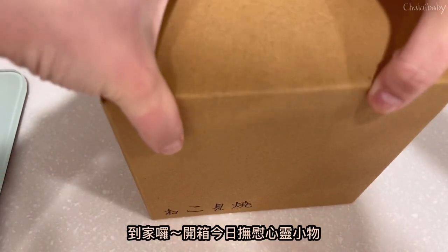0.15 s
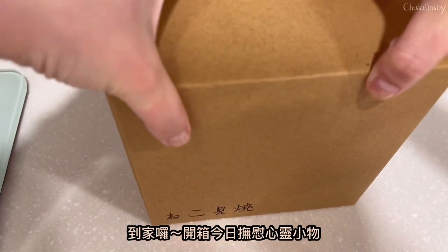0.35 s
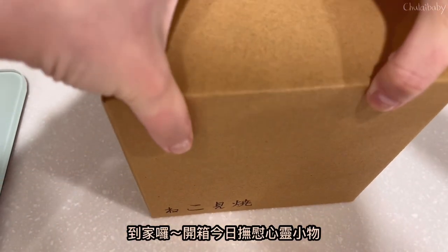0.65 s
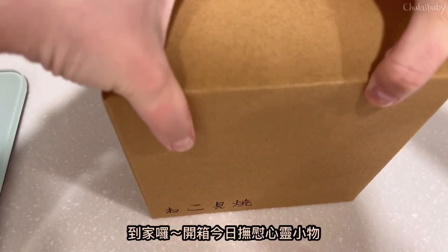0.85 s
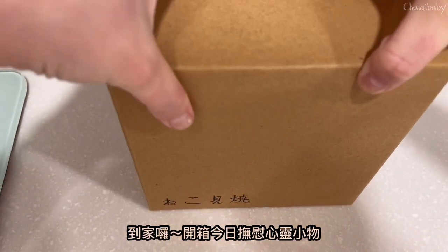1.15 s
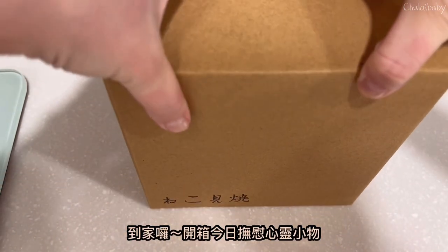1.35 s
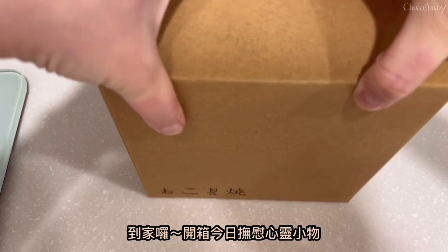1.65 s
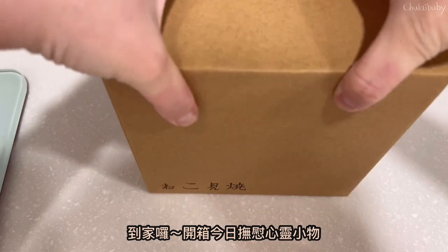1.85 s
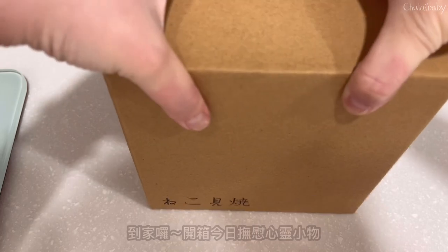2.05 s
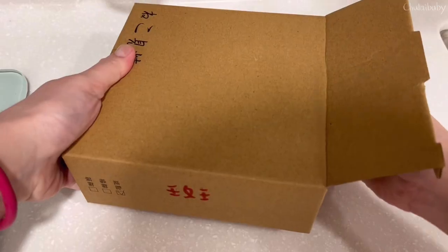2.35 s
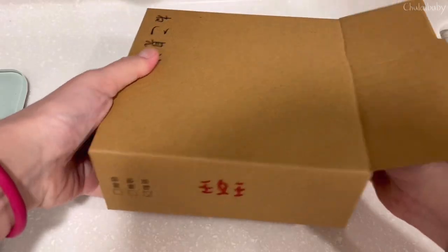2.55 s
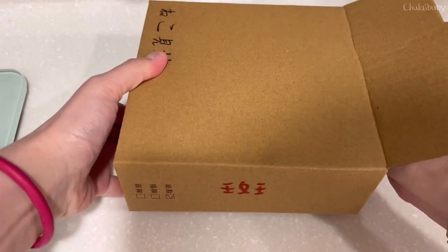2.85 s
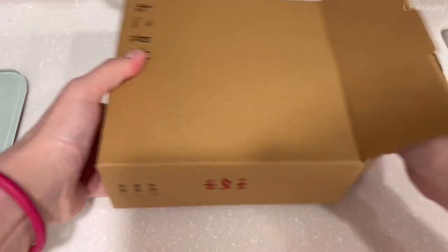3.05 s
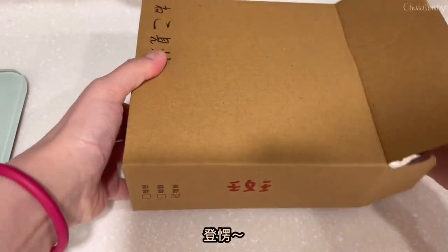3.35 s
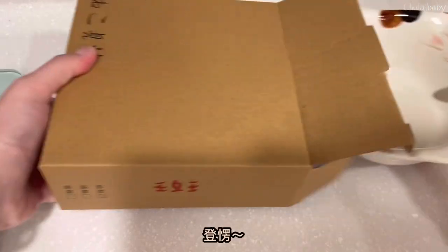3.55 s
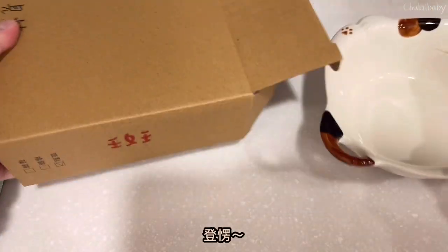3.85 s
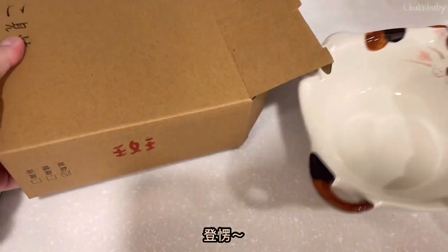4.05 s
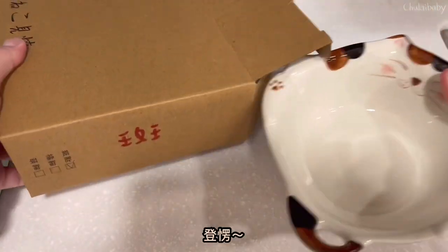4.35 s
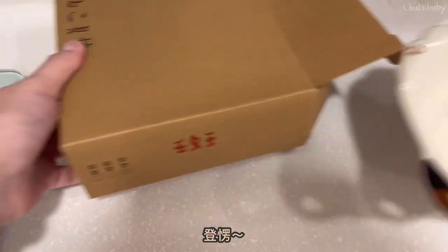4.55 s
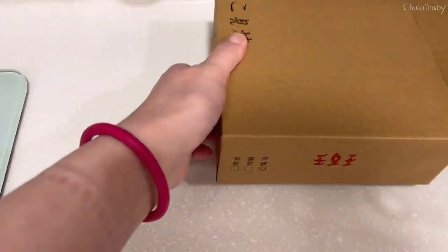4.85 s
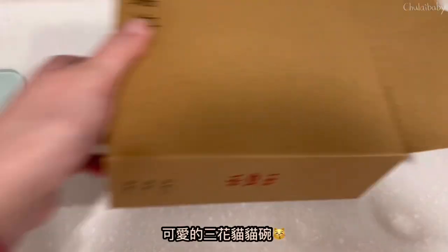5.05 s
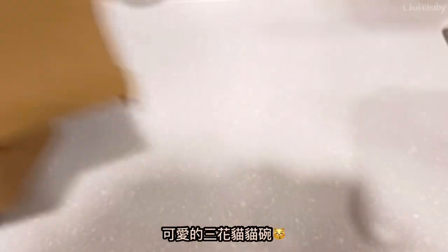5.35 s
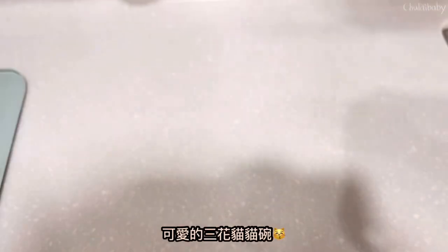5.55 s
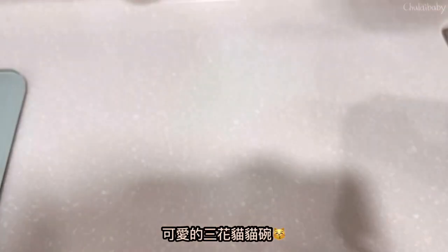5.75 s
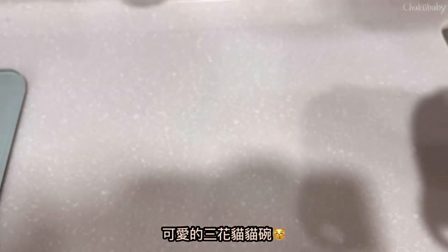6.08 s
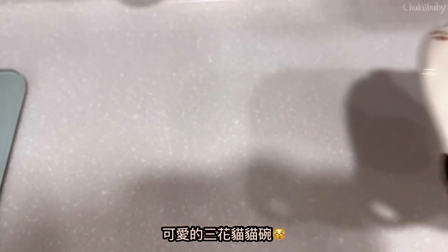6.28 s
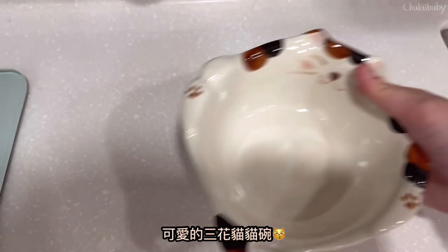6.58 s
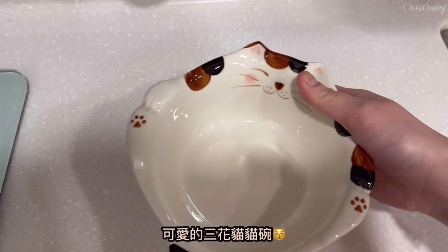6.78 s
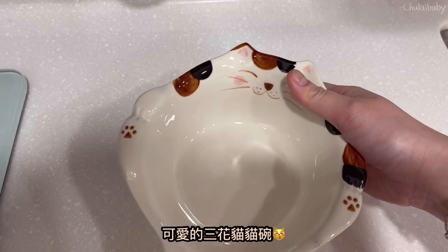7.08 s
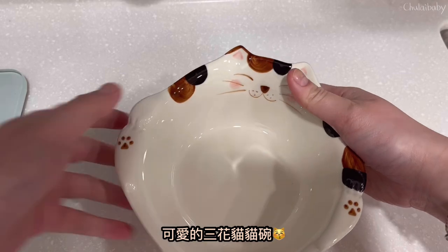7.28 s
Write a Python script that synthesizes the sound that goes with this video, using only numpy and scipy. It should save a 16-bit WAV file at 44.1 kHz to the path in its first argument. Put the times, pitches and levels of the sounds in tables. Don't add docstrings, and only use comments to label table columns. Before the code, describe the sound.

Close cardboard creaks, dull flap knocks and dry cracks, followed by a scraping bowl, a bright ceramic clink and soft handling bumps.

```python
import sys
import numpy as np
from scipy import signal
from scipy.fft import rfft, irfft, next_fast_len
from scipy.io import wavfile

SR = 44100
rng = np.random.default_rng(int(sys.argv[2]) if len(sys.argv) > 2 else 0)


def volts(x):
    e = np.asarray(x, float) / 20
    return 10 ** e


def store_pcm(level_fs):
    pcm = np.round(np.clip(level_fs, -1, 1) * 32767).astype(np.int16)
    wavfile.write(sys.argv[1], SR, np.atleast_2d(pcm).T)


N = 327222

# mode_hz, width_hz, level_db
BOX_MODES = [(447, 60, -5), (582, 50, -11.5), (780, 140, -9.5), (1006, 75, -16), (1315, 120, -17.5),
             (1416, 27, -10), (2430, 170, -14), (3230, 53, -10.5), (3680, 11, -29), (4770, 83, -15.5),
             (5418, 69, -10.5), (6750, 42, -16)]


def rms_one(x):
    return x / np.sqrt(np.mean(x ** 2) + 1e-20)


def peak_one(x):
    return x / abs(x).max(axis=1, keepdims=True)


def band(x, low_hz, high_hz, order=2):
    return signal.sosfilt(signal.butter(order, [low_hz, high_hz], "band", fs=SR, output="sos"), x)


def tinted(x, points):
    hz, db = np.transpose(points)
    size = next_fast_len(N)
    bins = np.maximum(np.fft.rfftfreq(size, 1 / SR), 1)
    gain = volts(np.interp(np.log(bins), np.log(hz), db))
    return irfft(rfft(x, size) * gain, size)[..., :N]


def drift(rate_hz):
    r = np.exp(-2 * np.pi * rate_hz / SR)
    noise = rng.standard_normal(N + SR)
    return rms_one(signal.lfilter([1], [1, -2 * r, r * r], noise)[SR:])


def ring(push, hz, t60):
    r, w = volts(-60 / (t60 * SR)), 2 * np.pi * hz / SR
    return signal.lfilter([0, np.sin(w)], [1, -2 * r * np.cos(w), r * r], push + 1e-18)


def body(push, modes, widen, patchy_db):
    out = 0
    for k, (hz, width_hz, db) in enumerate(modes):
        r = np.exp(-np.pi * width_hz * widen / SR)
        w = 2 * np.pi * hz / SR
        grip = volts(db + patchy_db * drift(8.0))
        unit_gain = [(1 - r * r) / 2, 0, (r * r - 1) / 2]
        mode = signal.lfilter(unit_gain, [1, -2 * r * np.cos(w), r * r], push)
        out = out + (-1) ** k * grip * mode
    return out


def room_tone():
    # band_hz, density_db
    spectrum = [(18, -36), (30, -2), (64, 5.5), (143, 1), (222, -22), (448, -22.5), (716, -26),
                (6040, -47.5), (10200, -55.5), (12500, -42.5), (15000, -65)]
    return volts(-68) * rms_one(tinted(rng.standard_normal((2, N)), spectrum))


def echo(x, t60, gap_s, channels):
    shift_s = 0.3
    t, hop = np.arange(SR // 3) / SR, round(shift_s * SR)
    out = np.zeros((channels, N + 2 * SR))
    fade = np.sin(np.pi * np.arange(2 * hop) / (2 * hop))
    x = np.pad(x, (hop, 2 * hop))
    for i in range(0, N + hop, hop):
        tail = rng.standard_normal((channels, len(t))) * volts(-60 * t / t60) * (t > gap_s)
        tail = unit_energy(tail)
        wet = signal.fftconvolve((fade * x[i:i + 2 * hop])[None], tail, axes=1)
        out[:, i:i + wet.shape[1]] += wet
    return out[:, hop:hop + N]


def unit_energy(x):
    return x / np.sqrt(np.sum(x ** 2, axis=1, keepdims=True))


def reflections(near):
    t60_s, level_db, wall_cut_hz = 0.16, -7, 1600
    dull = np.exp(-2 * np.pi * wall_cut_hz / SR)
    wet = echo(band(near[0], 230, 9000), t60_s, 0.0018, channels=2)
    return volts(level_db) * signal.lfilter([1 - dull], [1, -dull], wet)


def counter():
    # time_s, rumble_db
    load = [
        (0.0, -57),
        (1.1, -57.5),
        (4.341, -56.5),
        (4.81, -64),
        (6.03, -70.5),
        (6.26, -52.5),
        (6.608, -48),
        (6.82, -62),
        (7.42, -70),
    ]
    # start_s, peak_db, pitch_hz, t60_s
    thumps = [(1.838, -36, 213, 0.061), (0.593, -39, 117, 0.064), (0.963, -28.5, 77.5, 0.08),
              (0.983, -30, 77, 0.14), (1.075, -32, 76.5, 0.088), (1.05, -38, 213, 0.048),
              (1.116, -32, 72, 0.076), (1.699, -42.5, 105, 0.11), (1.899, -39, 116, 0.13),
              (2.008, -27, 130, 0.069), (3.035, -23.5, 238, 0.11), (3.061, -19.5, 191, 0.085),
              (3.468, -38.5, 138.6, 0.3), (3.593, -36, 200, 0.081), (3.82, -27.5, 218.4, 0.11),
              (4.267, -31, 226, 0.057), (4.368, -38, 113, 0.094), (4.719, -47.5, 124, 0.17),
              (6.074, -29, 128, 0.25), (6.176, -34.5, 120, 0.11), (6.293, -37, 192, 0.27),
              (6.493, -38.5, 185.3, 0.26), (6.659, -38.5, 124, 0.14), (6.734, -31, 142.6, 0.091)]
    # mode_hz, width_hz, level_db
    slab_modes = [(71, 9.3, 1.5), (124, 27, -1.5), (170, 74, -8)]
    shake = rng.standard_normal((2, N))
    rumble = body(shake, slab_modes, widen=0.48, patchy_db=2.5) + 0.13 * band(shake, 45, 260)
    booms, size = np.zeros((2, N + SR)), SR
    landing = np.exp(-((np.arange(size) / SR - 0.003) / 0.00039) ** 2)
    for start_s, peak_db, hz, t60 in thumps:
        boom = ring(landing, hz, t60) + 0.1 * ring(landing, 0.65 * hz, 0.26)
        quarter_period = round(SR / hz / 4)
        late = 0.9 * rng.choice([-1, 1]) * np.roll(boom, quarter_period)
        booms[:, round(start_s * SR):][:, :size] += volts(peak_db) * np.array([boom, late]) / abs(boom).max()
    time_s, rumble_db = np.transpose(load)
    return volts(np.interp(np.arange(N) / SR, time_s, rumble_db)) * rms_one(rumble) + booms[:, :N]


def shove():
    # time_s, level_db
    away = [
        (5.2, -100),
        (5.29, -72.5),
        (5.385, -87.5),
        (5.416, -56.5),
        (5.5, -66),
        (5.62, -78),
        (5.8, -79.5),
        (5.95, -97),
    ]
    # band_hz, density_db
    swish = [(600, -42), (1000, -13.5), (2200, -3.5), (4400, -1.5), (8000, -13.5), (13000, -30)]
    time_s, db = np.transpose(away)
    path_db = np.interp(np.arange(N) / SR, time_s, db, left=-120, right=-120)
    level = volts(path_db + 1.5 * drift(15))
    return level * rms_one(tinted(rng.standard_normal((2, N)), swish))


def haze():
    start_s, end_s, hz, width_hz, db = 4.3, 4.6, 4900, 500, -72
    corners_s = [start_s - 0.05, start_s, end_s - 0.12, end_s]
    gate = np.interp(np.arange(N) / SR, corners_s, [0, 1, 1, 0])
    whisper = band(rng.standard_normal((2, N)), hz - width_hz / 2, hz + width_hz / 2)
    return volts(db) * gate * rms_one(whisper)


def tinkles():
    # start_s, level_db, softness_db (per octave)
    touches = [
        (4.177, -35.5, 0.5),
        (4.487, -49.5, -10),
    ]
    # mode_hz, level_db, t60_s
    glaze = [(3074, -5.5, .25), (3704, -24, .2), (4312, -24, .2), (5238, -24, .3), (5647, -22, .15),
             (5981, -17, .55), (6051, 0, .19), (7962, -25, .4), (11590, -22, .26)]
    rings = []
    for hz, mode_db, t60 in glaze:
        clicks = np.zeros(N)
        for start_s, db, soft_db in touches:
            octaves = np.log2(hz / glaze[0][0])
            clicks[round(start_s * SR)] = volts(db + mode_db + soft_db * octaves)
        rings.append(ring(clicks, hz, t60))
    return np.array([sum(rings), sum(rings[::2]) - sum(rings[1::2])])


def blows():
    # start_s, knock_db, pitch_hz, crack_db, treble_db (re crack)
    flap_blows = [(.018, -47, 474, -50.5, -0.5), (.417, -37, 470, -39, -25.5), (.7, -34, 442, -44, -11.5),
                  (.749, -38, 410, -39.5, -13), (.776, -33, 443, -38.5, -19),
                  (.863, -37.5, 538, -44.5, -19), (1.116, -14, 609, -20.5, -10.5),
                  (1.288, -31.5, 477, -29, -13), (1.587, -36.5, 427, -39.5, -17.5),
                  (1.693, -29.5, 740, -43.5, -10.5), (1.744, -26, 445, -30, -25.5),
                  (1.834, -15, 898, -22, -18.5), (1.901, -15.5, 482, -26.5, -7),
                  (2.005, -8.5, 612, -13.5, -22.5), (2.153, -30.5, 447, -33, -18.5)]
    slide_blows = [
        (3.455, -7.5, 1138, -24, -20.5),
        (3.519, -13.5, 1264, -28.5, -17),
        (3.651, -20, 670, -35.5, -16),
        (3.819, -15.5, 680, -41, -21),
        (3.862, -26, 585, -34.5, 0),
    ]
    bowl_blows = [(4.007, -26, 470, -37.5, -19), (4.026, -22.5, 946, -42, -8),
                  (4.036, -32.5, 930, -40, -11.5), (4.066, -33.5, 473, -42, -14.5),
                  (4.087, -24, 700, -43, -17), (4.099, -26, 474, -39, -15.5), (4.124, -31, 454, -32.5, -15),
                  (4.146, -31, 466, -38.5, -14), (4.168, -25, 766, -39.5, -18),
                  (4.207, -28.5, 447, -45.5, -18.5), (4.265, -24.5, 436, -36.5, -15.5),
                  (4.286, -23, 700, -42, -19), (4.471, -35.5, 385, -42.5, -10.5),
                  (4.488, -27.5, 442, -48, -7.5), (4.715, -31, 509, -41, -21), (6.07, -39, 600, -30, -15.5)]
    # ring_t60_s, contact_ms, crack_after_ms, crack_length_ms
    flap = (0.051, 1.8, 1.2, 5.2)
    slide = (0.0251, 3, -2, 5.5)
    foot = (0.06, 2.5, -1, 4.5)
    kinds = ((flap_blows, flap), (slide_blows, slide), (bowl_blows, foot))
    return [row + kind for rows, kind in kinds for row in rows]


def cracks():
    # start_s, peak_db, treble_db
    # (re peak), length_ms
    snaps = [(0.139, -49, -8.5, 23), (0.5386, -43.5, -6, 13), (0.5716, -37, -5.5, 10.3),
             (.9666, -45, -14.5, 4.1), (1, -37.5, -10, 2.2), (1.7629, -26.5, -16.5, 6.9),
             (1, -46.5, -10.5, 3), (.6365, -46, -10, 3), (.5143, -46.5, -10, 4), (.8266, -50, -10.5, 3),
             (1.2, -42, -11.5, 4), (2.4567, -41, -5, 3), (3, -35, -10, 4.2), (3.445, -27.5, -12, 6.5),
             (2.013, -23, -10, 8.8), (2.785, -38.5, -12.5, 2.3), (4.045, -44.5, -5.5, 11),
             (4.1781, -31.5, -8.5, 4.5), (6.1576, -40.5, -12.5, 22), (6.56, -37.5, -25, 30)]
    # band_hz, level_db
    spray = [(3000, -21), (4500, -0.5), (6000, -1), (8000, -4.5), (10000, -6), (13000, -9), (15500, -10)]
    edgy, treble, size = np.zeros((2, N + SR)), np.zeros((2, N + SR)), SR // 4
    t = np.arange(size) / SR
    struck = []
    for s, _, _, db, treble_db, _, _, after_ms, length_ms in blows():
        struck.append((s + after_ms / 1000, db, treble_db, length_ms))
    for start_s, db, treble_db, length_ms in struck + snaps:
        tau = length_ms / 1000
        decay = np.exp(-t / tau) + 0.13 * np.exp(-t / min(5.5 * tau, 0.024))
        burst = rng.standard_normal((2, size)) * np.minimum(t / 0.0014, 1) * decay
        first = round(start_s * SR)
        edgy[:, first:][:, :size] += volts(db) * burst
        treble[:, first:][:, :size] += volts(db + treble_db) * burst * (1 + 0.5 * (t < tau / 2))
    edgy, treble = edgy[:, :N], treble[:, :N]
    rung = edgy + 5.8 * body(edgy, BOX_MODES, widen=0.37, patchy_db=3.0)
    return volts(5.0) * band(rung, 760, 3500) + volts(9.5) * tinted(treble, spray)


def knocks():
    # start_s, level_db, pitch_hz, t60_s
    bumps = [(.176, -28, 528, 0.072), (.249, -37, 520, .04), (.261, -40, 464, 0.055),
             (.305, -46, 1420, .06), (.307, -47, 3065, .07), (.324, -40, 1510, 0.046),
             (0.337, -36.5, 467, 0.035), (.416, -38, 2580, 0.033), (.445, -46, 1510, 0.044),
             (.506, -40, 516, .06), (.606, -31, 503, 0.093), (.648, -31, 464, 0.094), (.73, -37.5, 448, .1),
             (1.05, -33, 780, 0.14), (1.41, -34.5, 520, 0.1), (2.011, -16, 439.5, 0.11),
             (3.038, -22.5, 1243, .05), (3.066, -16.5, 603, .06), (3.084, -25, 476, .06),
             (3.461, -11, 480, 0.031), (3.494, -24.5, 1270, 0.095), (3.595, -33.5, 720, 0.058),
             (3.66, -19, 704, 0.047), (4.173, -30, 447, 0.14), (4.193, -29, 443, .1),
             (4.508, -30, 440, .05), (6.075, -24.5, 613, 0.07), (6.169, -33.5, 958, 0.1),
             (6.202, -22.5, 978, 0.047), (6.344, -32, 860, 0.066), (6.366, -33, 482, .06),
             (6.391, -32, 512, .06), (6.413, -30, 498, .06), (6.505, -38, 471, 0.16),
             (6.527, -33, 476, 0.14), (6.555, -29, 775, .08), (6.669, -33.5, 474, 0.081),
             (6.73, -40, 473, 0.056), (6.068, -29, 1700, 0.026), (6.225, -31.5, 900, 0.065),
             (6.156, -41, 2500, .06), (6.29, -42, 2500, 0.057), (6.565, -38, 2400, 0.07),
             (.665, -32, 602, .06), (4.045, -30, 940, 0.06), (4.297, -27.5, 478, .06),
             (4.01, -29.5, 931, 0.078), (6.9, -58, 620, .05), (6.936, -52, 504, .09),
             (7.341, -61, 484, 0.091)]
    out, size = np.zeros((2, N + SR)), SR // 2
    t = np.arange(size) / SR
    hits = [row[:3] + row[5:7] for row in blows()]
    hits += [row + (2.6,) for row in bumps]
    for start_s, db, hz, t60, contact_ms in hits:
        contact = np.minimum(t / 0.0018, 1) * np.exp(-t / (contact_ms / 1000))
        top_hz = hz * (4.5 + db / 20)
        push = band(rng.standard_normal((2, size)) * contact, 410, top_hz)
        panel = volts(-6.5) * peak_one(push) + peak_one(ring(push, hz, t60))
        for ratio in np.array([0.8, 1.2, 1.45, 1.75, 2.1]) * volts(rng.normal(0, 0.3, 5)):
            neighbour = peak_one(ring(push, hz * ratio, 0.6 * t60 / ratio))
            panel = panel + neighbour * volts(-7.5 - 5.0 * abs(np.log2(ratio)))
        out[:, round(start_s * SR):][:, :size] += volts(db) * peak_one(panel)
    return out[:, :N]


def slips(per_s, spread_db, clump_db, smooth):
    sizes = volts(spread_db * np.minimum(rng.exponential(1, (2, N)), 5))
    signs = rng.choice([-1, 1], (2, N))
    clicks = sizes * signs * (rng.random((2, N)) < per_s / SR)
    return volts(clump_db * drift(16)) * (rms_one(clicks) + smooth * rng.standard_normal((2, N)))


def pressure():
    # peak_s, drag_db, rise_s, fall_s (each per 20 dB), hiss_db (re drag)
    squeezes = [(0, -47, .1, 0.22, -18), (0.178, -36.5, 0.097, 0.13, -23), (0.337, -51.5, 0.06, 0.4, -11.5),
                (.55, -45, 0.071, -0.14, -12), (.65, -42, 0.18, 0.35, -22), (.77, -44, 0.19, 0.14, -34),
                (.99, -40.5, 0.029, 0.3, -39), (1.07, -34, 0.074, -0.61, -25), (1.158, -45, 0.19, 0.02, -9),
                (1.3, -41.5, 0.042, 0.02, -15.5), (1.42, -42, 0.28, 0.1, -16),
                (1.588, -49, 0.027, 0.05, -8), (1.71, -48.5, 0.095, 0.1, -11),
                (1.77, -49.5, 0.089, -0.17, -10.5), (1.855, -40.5, 0.082, 0.01, -11),
                (1.933, -39.5, 0.098, 0.13, -22.5), (1.965, -45, 0.041, 0.2, -5),
                (2.048, -41.5, 0.13, 0.3, -17), (2.189, -45.5, 0.19, 0.32, -19.5)]
    pulls = [
        (2.42, -50, 0.32, 0.6, -13),
        (2.552, -45.5, 0.21, 0.16, -1.5),
        (2.805, -41.5, 0.055, 0.62, -13),
        (2.97, -43.5, 0.42, 0.3, -14.5),
        (3.04, -32.5, 0.07, 0.11, -7),
        (3.087, -23.5, .15, 0.029, -12.5),
        (3.445, -28.5, 0.06, 0.1, -12.5),
        (3.548, -31.5, 0.14, 0.072, -28.5),
        (4.738, -56.5, 0.034, 0.11, -3),
        (4.959, -71, 0.096, 0.13, -8.5),
    ]
    drags = [(3.679, -44, 0.073, 0.088, -23.5), (3.848, -31.5, 0.032, 0.04, -41.5),
             (3.9, -54.5, .05, 0.1076, -7), (4.03, -34.5, 0.011, 0.22, -37), (4.1, -40, 0.058, 0.31, -31),
             (4.2, -38.5, .07, 0.051, -21.5), (4.299, -38, 0.071, 0.057, -33.5),
             (4.468, -45.5, .02, .03, -22), (4.51, -40.5, 0.056, 0.086, -28.5),
             (6.099, -49, 0.051, 0.1, -5), (6.19, -36.5, 0.046, 0.15, -11.5), (6.29, -42, 0.15, 0.17, -20),
             (6.4, -34, 0.16, 0.175, -27.5), (6.529, -32.5, 0.095, 0.105, -26),
             (6.585, -41, 0.1, 0.068, -31.5), (6.68, -56.5, .04, 0.031, -2),
             (6.945, -63.5, 0.049, 0.035, -31), (7.32, -69.5, 0.048, 0.049, -34.5)]
    # time_s, drag_db
    grip = [(0, -55.5), (.28, -72), (.4, -58), (.475, -76), (.7, -61), (.93, -66), (1.4, -67), (1.5, -82),
            (1.57, -85), (1.65, -66), (2.25, -64), (2.73, -66), (3.23, -59.5), (3.6, -57.5), (3.8, -70.5),
            (3.95, -70), (4.33, -62), (4.43, -72), (4.68, -73), (5.05, -81), (6, -87), (6.66, -78),
            (6.85, -87.5), (7.42, -79)]
    grip_offsets_db = np.array([[0], [-7.5], [-11]])
    roundness = 1.075
    rasp_db, rasp_follows = 2, 0.63
    t = np.arange(0, N + 32, 32) / SR
    power = volts(np.interp(t, *np.transpose(grip)) + grip_offsets_db) ** 2
    for peak_s, db, rise_s, fall_s, hiss_db in squeezes + pulls + drags:
        distance = np.where(t < peak_s, (peak_s - t) / rise_s, (t - peak_s) / max(fall_s, 0.004))
        offsets_db = np.array([[0], [rasp_db + rasp_follows * hiss_db], [hiss_db]])
        power = power + volts(db - 20 * distance ** roundness + offsets_db) ** 2
    return [np.interp(np.arange(N) / SR, t, np.sqrt(p)) for p in power]


def rubbing():
    stage_starts = [
        2.24,
        3.6,
        5.5,
    ]
    # mode_hz, width_hz, level_db
    open_box = [(537, 230, -2), (720, 130, 3), (1265, 110, -4.5), (1700, 61, -16.5), (2280, 200, -7),
                (2590, 45, -4.5), (2920, 54, -8), (3240, 60, -10), (3640, 60, -12.5)]
    bowl_modes = [(474, 31, 3.5), (638, 14, -4), (923.5, 20, -5), (1340, 88, -17.5), (1760, 170, -26),
                  (2540, 73, -25.5), (3100, 280, -22), (3860, 47, -25), (4300, 56, -24.5),
                  (5180, 230, -33.5), (6430, 65, -44.5)]
    lifted = [(473, 43, 1.5), (620, 56, -8.5), (820, 50, 0.5), (984, 40, -2.5), (1280, 50, -9.5),
              (1730, 200, -14), (2060, 210, -18.5), (2400, 100, -17), (3110, 66, -20.5), (3900, 60, -25)]
    # band_hz, level_db
    hiss_colour = [(3000, -21), (4500, -1), (6000, 0.5), (8000, -4.5), (10000, -5.5), (13000, -5.5),
                   (15500, -7)]
    drag, rasp, hiss = pressure()
    stage = np.searchsorted(stage_starts, np.arange(N) / SR)
    stream = slips(1500, spread_db=2.5, clump_db=2.5, smooth=0.93)
    fine = slips(6000, spread_db=5.5, clump_db=3.0, smooth=3.0) + 0.22 * stream
    judder = slips(400, spread_db=3.5, clump_db=2.0, smooth=0.6)
    box = body(stream * (stage == 0), BOX_MODES, widen=1.1, patchy_db=4.0)
    sliding = volts(-7.5) * body(stream * (stage == 1), open_box, widen=1.3, patchy_db=1.0)
    bowl = body(judder * (stage == 2), bowl_modes + [(774, 36, -3.0)], widen=0.97, patchy_db=3.0)
    tipped = volts(1.0) * body(judder * (stage == 3), lifted, widen=0.7, patchy_db=4.5)
    rung = box + sliding + bowl + tipped
    panels = band(rung + volts(-18.5) * stream, 340, 1750, order=3)
    edges = band(rung + volts(-16.0) * stream, 1600, 4000, order=3)
    fizz = tinted(fine, hiss_colour)
    return drag * rms_one(panels) + volts(-1.0) * rasp * rms_one(edges) + volts(2.0) * hiss * rms_one(fizz)


def scene():
    near = rubbing() + counter() + shove() + knocks() + cracks() + tinkles() + haze()
    return near + reflections(near) + room_tone()


def top_cut(x):
    return signal.sosfilt(signal.butter(12, 16680, fs=SR, output="sos"), x)


def record(dry):
    # band_hz, likeness, right_lead_turns, left_louder_db
    port_bands = [(60, .82, 0, .8), (160, .72, 0, 1.2), (300, .93, 0, .3), (600, .65, 0, 3),
                  (1100, .62, .03, 1), (1900, .05, 0, 1), (2200, .85, -.03, 2), (4000, .6, -.11, 4),
                  (6000, .45, 0, 5), (8100, .6, .26, 3), (9400, .96, .45, .3), (11100, .95, .56, 0),
                  (12000, .7, .8, 0), (13000, .96, .97, 0), (16000, .97, 1.02, 0)]
    # notch_hz, width_hz, share
    notches = [(310, 45, 0.23), (829, 47, 0.35), (2070, 81, .4)]
    top_hz, last_hz, low_cut_hz = 15750, 16650, 44
    size = next_fast_len(N + 4096)
    bins = np.fft.rfftfreq(size, 1 / SR)
    hz, *columns = np.transpose(port_bands)
    alike, turns, louder_db = (np.interp(bins, hz, column) for column in columns)
    shared, scattered = rfft(dry, size) * np.sqrt([(1 + alike) / 2, (1 - alike) / 2])
    for notch_hz, width_hz, share in notches:
        shared = shared * (1 - share * np.exp(-((bins - notch_hz) / width_hz) ** 2))
    half = volts(louder_db / 2) * np.exp(-1j * np.pi * turns)
    top = np.where(bins < top_hz, 1, volts(-34)) * (bins < last_hz)
    left, right = (shared + scattered) * half * top, (shared - scattered) / half * top
    ports = irfft([left, right], size)[:, :N]
    ports = signal.sosfilt(signal.butter(6, low_cut_hz, "high", fs=SR, output="sos"), ports)
    return top_cut(ports)


dry = scene()
out = record(dry)
store_pcm(out)
```